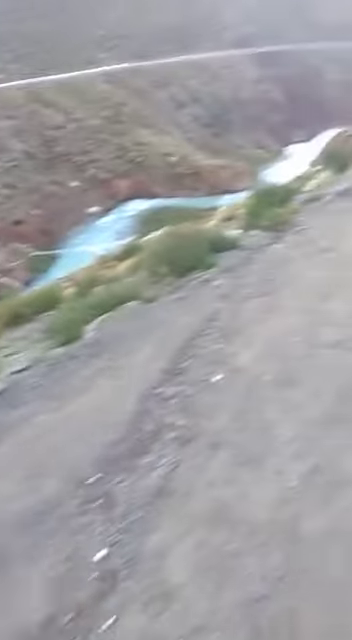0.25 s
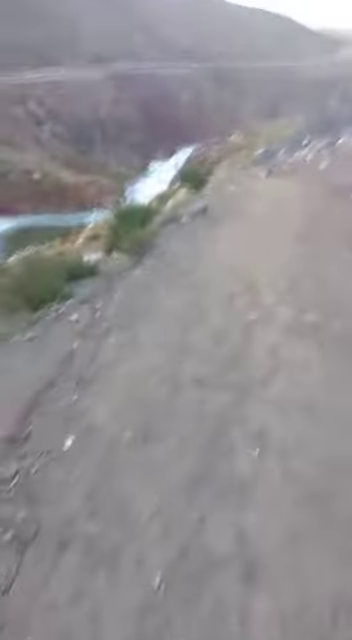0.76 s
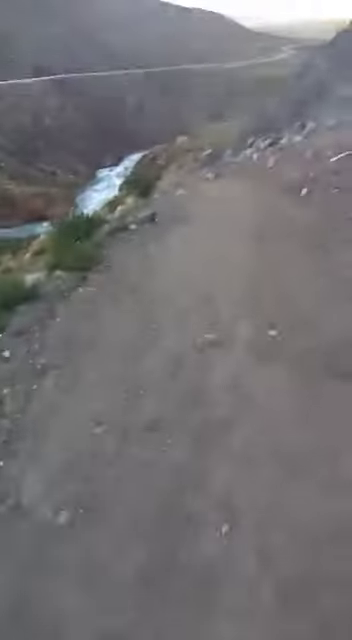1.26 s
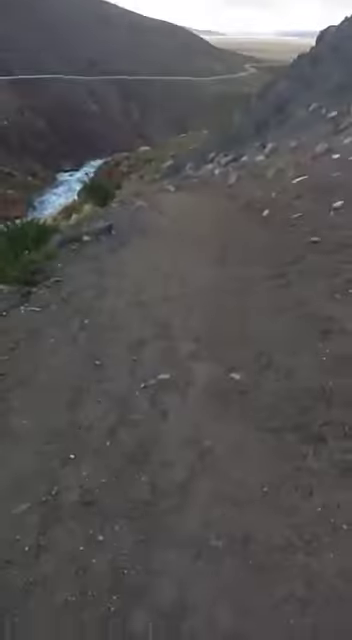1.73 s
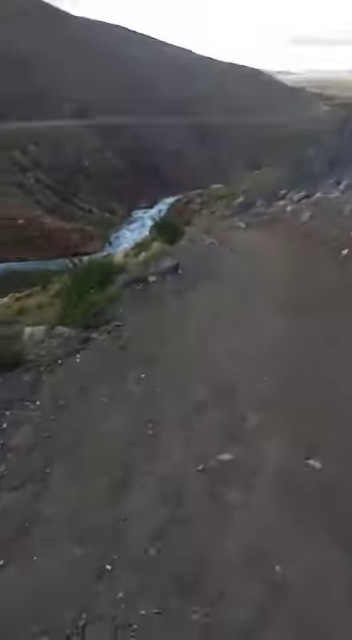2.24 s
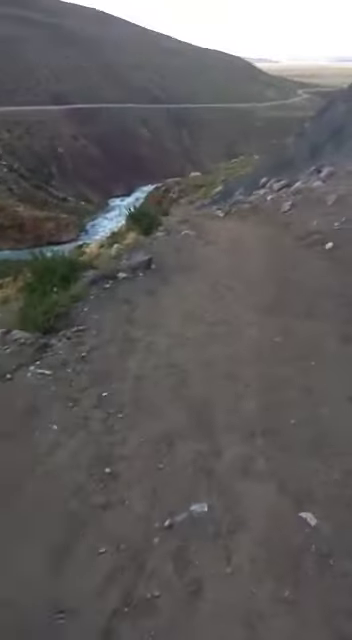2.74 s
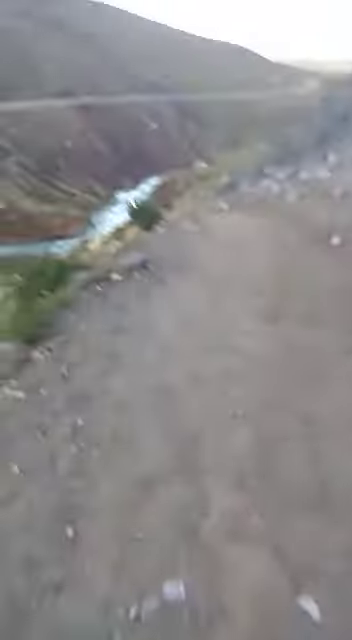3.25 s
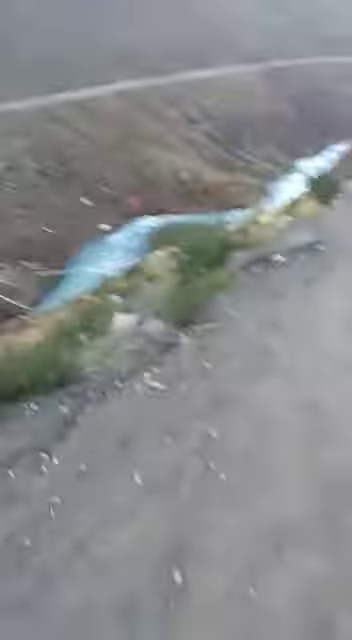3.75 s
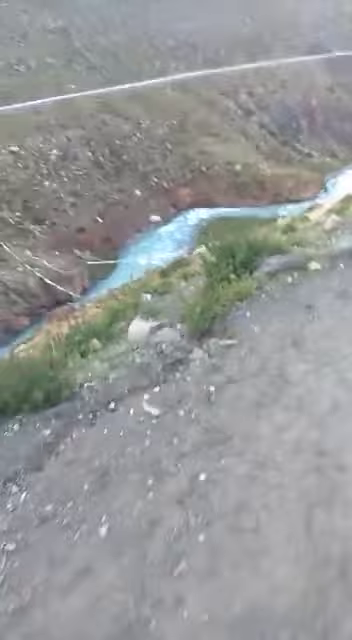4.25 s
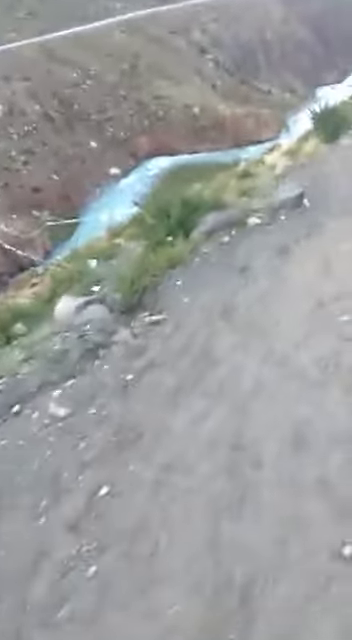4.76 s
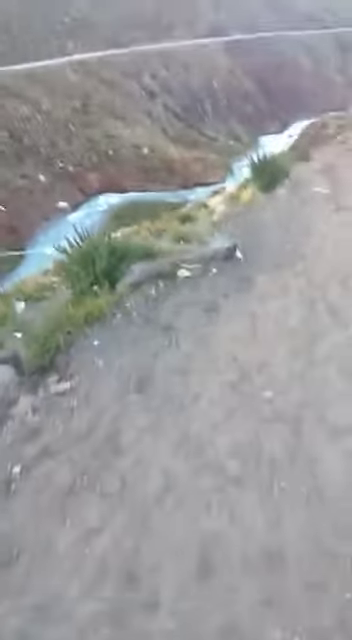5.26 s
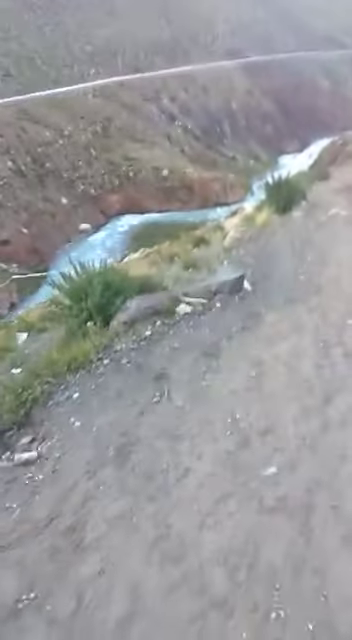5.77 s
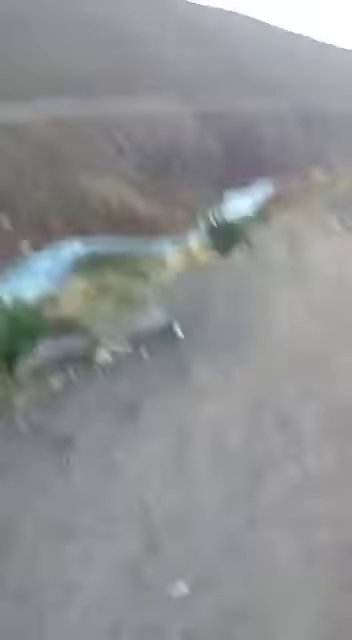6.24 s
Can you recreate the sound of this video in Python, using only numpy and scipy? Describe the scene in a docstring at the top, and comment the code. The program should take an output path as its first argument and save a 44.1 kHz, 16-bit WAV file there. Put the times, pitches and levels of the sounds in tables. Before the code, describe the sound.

Steady footsteps crunch brightly on fine gravel, mostly to the left, with sharp stone ticks and a faint river rushing steadily behind.

```python
"""Footsteps on gravel above a river

Someone strides along a gravel track holding a camera. Feet scuff, land and grind fine grit into a bright crunch,
mostly on the left, that dulls at most roll-offs: dense grains, split by pitch and shaped by the weight on the sole.
Pebbles grate, flat stones skid (noise bursts through resonances) and gravel ticks; the hand bumps the camera and
later rubs it (wavering resonances, short low tones). The river is coloured noise, rushing almost steadily."""
import sys
import numpy as np
from scipy import signal
from scipy.fft import rfft, irfft
from scipy.io import wavfile
from scipy.ndimage import uniform_filter1d

SR = 44100
rng = np.random.default_rng(int(sys.argv[2]) if len(sys.argv) > 2 else 0)


def dump(signal):
    """Clip the signal to [-1, 1] and save it as 16-bit WAV at the path in sys.argv[1]."""
    limited = np.clip(np.atleast_2d(signal).T, -1, 1)
    pcm = np.round(limited * 32767).astype(np.int16)
    wavfile.write(sys.argv[1], SR, pcm)


N = 286650
TIME = np.arange(N) / SR


def undb(db):
    """Decibels to gain."""
    return 10 ** (np.asarray(db) / 20)


def unit(x):
    """Scale to rms 1."""
    return x / np.sqrt(np.mean(x ** 2) + 1e-20)


def over_hz(points):
    """Spread a (frequency, value) table over the bins of the spectrum."""
    hz, value = np.transpose(points)
    bin_hz = np.arange(N // 2 + 1) * SR / N
    return np.interp(np.log(bin_hz + 1), np.log(hz), value)


def weigh(x, gain):
    """Multiply the spectrum of x by a gain per bin."""
    return irfft(rfft(x) * gain, N)


def colour(x, points):
    """Filter x by a (frequency, level) table, then scale to rms 1."""
    return unit(weigh(x, undb(over_hz(points))))


def resonate(x, hz, width_hz):
    """A steep resonance: the same band-pass twice, width_hz being that of each pass."""
    b, a = signal.iirpeak(min(hz, .45 * SR), hz / width_hz, fs=SR)
    once = signal.lfilter(b, a, x)
    return signal.lfilter(b, a, once)


def highpass(x, hz):
    """Steep low cut."""
    return signal.sosfilt(signal.butter(4, hz, "high", fs=SR, output="sos"), x)


def walk(rate):
    """Slow chance at rms 1: random levels held 1 / rate s and slewed twice."""
    hold = max(int(SR / rate), 2)
    levels = np.repeat(rng.standard_normal(N // hold + 1), hold)
    slewed = uniform_filter1d(uniform_filter1d(levels, hold), hold)
    return unit(slewed[:N])


def grains(per_s, spread_db):
    """Tiny impacts at random moments, of random sign and with strengths scattered in dB."""
    size = undb(spread_db * np.minimum(rng.exponential(size=N), 5))
    hits = rng.random(N) < per_s / SR
    return unit(hits * rng.choice([-1, 1], N) * size)


def band_flicker(x, depth_db, size=384):
    """Random band-by-band flicker: each narrow band of the noise swells and fades on its own."""
    _, _, frames = signal.stft(x, nperseg=size)
    chance = uniform_filter1d(rng.standard_normal(frames.shape), size=2, axis=0)
    chance = uniform_filter1d(chance, size=5, axis=1)
    swell = undb(depth_db * np.clip(unit(chance), -2, 2))
    return unit(signal.istft(frames * swell, nperseg=size)[1][:N])


def rasp(length_s):
    """A brief noise burst that swells quickly and dies away."""
    age = np.arange(SR // 4) / SR / (length_s / 3)
    return rng.standard_normal(SR // 4) * age * np.exp(1 - age)


def burst(ring, length_s, db):
    """Scale a short sound to db, its energy taken over length_s."""
    return unit(ring) * np.sqrt(length_s * SR / len(ring)) * undb(db)


def sides(pan_db):
    """Left and right gains, the left one being 1."""
    return np.array([[1], [undb(-pan_db)]])


def add(out, s, sound):
    """Mix a sound into out from time s."""
    i = max(int(s * SR), 0)
    out[..., i:i + sound.shape[-1]] += sound[..., :N - i]


def around_mean(level_db):
    """The crunch level as dB above or below its average."""
    return level_db - level_db.mean()


# colour of the rushing water: (frequency [Hz], relative level [dB])
RIVER_COLOUR = [(25, -39), (60, -26.5), (100, -13.5), (135, -4.5), (175, 0.5), (250, -1), (400, -6.5),
                (800, -9), (1500, -9.5), (2700, -14), (3300, -15), (4700, -22.5), (8000, -31), (15500, -56)]
# how alike the two sides are: (frequency [Hz], coherence [0-1])
RIVER_LIKENESS = [(60, 0.89), (130, 1), (290, 0.92), (640, 0.71), (1400, 0.29), (3100, 0.011)]
# side lean of the water: (frequency [Hz], left over right [dB])
RIVER_LEAN = [(100, 0.5), (300, -1.5), (1200, -0.5), (3000, -0.5)]


def river(level_db=-62.5, swell_db=1.0):
    """Distant white water: a smooth rush of noise, nearly alike on both sides in the bass and wide above."""
    likeness = np.clip(over_hz(RIVER_LIKENESS), 0, 1)
    mid = rfft(rng.standard_normal(N)) * np.sqrt(1 + likeness)
    side = rfft(rng.standard_normal(N)) * np.sqrt(1 - likeness)
    rush = np.array([colour(irfft(mid + sign * side, N), RIVER_COLOUR) for sign in (1, -1)])
    rush = weigh(rush, undb(np.outer([1, -1], over_hz(RIVER_LEAN)) / 2))
    return rush * undb(level_db + swell_db * walk(3.07))


# soft bumps through the camera body: (time [s], level before rise and low cut [dB], pitch [Hz], 60 dB decay [s])
BUMPS = [(.003, -52, 199, 0.084), (0.166, -45.5, 355, 0.039), (1.612, -43, 176, 0.042),
         (4.187, -47.5, 186, 0.085), (4.405, -51.5, 173, 0.062), (6.206, -38.5, 270, 0.067),
         (6.2193, -40.5, 277, 0.06)]


def bumps(rise_s=0.0023, low_cut_hz=145, pan_db=-4.5):
    """Soft fingers push the camera body, which answers with a few low, decaying cycles."""
    out, t = np.zeros((2, N)), TIME[:SR // 4]
    rise = 1 - np.exp(-(t / rise_s) ** 2)
    for s, db, hz, t60 in BUMPS:
        thud = rise * undb(db - 60 * t / t60) * np.sin(2 * np.pi * hz * t)
        add(out, s, thud * sides(pan_db))
    return highpass(out, low_cut_hz)


# from CONTACT_S on, the skin keeps creeping faintly between rubs
CONTACT_S, CREEP_DB = 3.5, -63.5


def wavering(note, offset_hz):
    """Shift the pitch of a note by a changing offset."""
    shift = np.exp(2j * np.pi * np.cumsum(offset_hz) / SR)
    return np.real(signal.hilbert(note) * shift)


# resonances of the camera case: (frequency [Hz], width of each pass [Hz], level before trim [dB])
CASE_MODES = [(2905, 53, -71.5), (3486, 44, -76), (3975, 70, -66), (4097, 86, -63.5), (4362, 110, -68),
              (4586, 34, -70)]


def case(level_db, rise_s=0.63, gain_db=-0.7, own_db=6, waver_hz=75, follow=0.49, pan_db=20):
    """The creeping hand keeps the stiff case ringing; its pitches wander and each step jolts it louder."""
    ring = 0
    for hz, width_hz, db in CASE_MODES:
        note = wavering(resonate(grains(3000, spread_db=0), hz, width_hz), waver_hz * walk(18))
        ring = ring + unit(note * undb(own_db * np.tanh(walk(20)))) * undb(db)
    touch = np.sqrt(np.clip((TIME - CONTACT_S) / rise_s, 0, 1))
    return ring * touch * undb(gain_db + follow * around_mean(level_db)) * sides(pan_db)


# the hand slides on the camera in short rubs:
# (middle time [s], level before trim [dB], half length [s], main hollow resonance before waver [Hz])
RUBS = [(3.552, -50.5, 0.027, 2235), (3.647, -56, 0.032, 2185), (3.762, -54, 0.016, 2255),
        (3.83, -55, 0.026, 2230), (3.973, -50.5, 0.041, 2322), (4.127, -49.5, 0.038, 2260),
        (4.258, -52.5, 0.04, 2242), (4.384, -45, 0.044, 2204), (4.503, -53.5, 0.042, 2250),
        (4.6, -53.5, .028, 2297), (4.753, -48, 0.029, 2253), (4.819, -56, 0.023, 2304),
        (4.929, -55, 0.018, 2090), (5.013, -56, 0.02, 2270), (5.112, -55, 0.019, 1953),
        (5.228, -53, 0.02, 2220), (5.386, -63, 0.074, 2140), (5.472, -54.5, 0.022, 2062),
        (5.598, -59, 0.03, 2114), (5.795, -60, 0.03, 2018), (5.897, -53.5, 0.023, 2344),
        (6.1, -74, 0.03, 2000), (6.245, -64, .022, 2124), (6.341, -72, .025, 2046),
        (6.483, -56.5, 0.038, 2190)]


def rub_power():
    """Power of the hand's friction: a steady creep with a swell for each rub."""
    power = undb(CREEP_DB) ** 2 * np.clip((TIME - CONTACT_S) / .1, 0, 1)
    for s, db, length_s, _ in RUBS:
        power = power + undb(db) ** 2 * np.exp(-np.minimum(((TIME - s) / length_s) ** 2, 40))
    return power


# hollow between hand and case: (ratio to the typical main resonance, width of each pass [Hz],
# relative level halfway through the contact [dB], growth as the grip shifts [dB/s])
HOLLOW = [(0.599, 150, -14, 1.5), (0.929, 90, -4, 3), (1.001, 110, 0.5, 0.5), (1.08, 90, -6.5, 3)]


def grip(gain_db=-3.0, flicker_db=3.5, own_db=3, waver_hz=36, pan_db=20):
    """Skin sticks and slips on the case and rings the hollow of the hand, which shifts by rub and wavers."""
    middle_s, _, _, rub_hz = np.transpose(RUBS)
    hz = np.interp(TIME, middle_s, rub_hz)
    centre_hz = np.median(hz)
    since_s = np.maximum(TIME - CONTACT_S, 0)
    ring = 0
    for ratio, width_hz, db, growth in HOLLOW:
        offset_hz = hz - centre_hz + ratio * waver_hz * walk(25)
        note = wavering(resonate(grains(3000, spread_db=-0.5), ratio * centre_hz, width_hz), offset_hz)
        grown_db = db + growth * (since_s - since_s[-1] / 2)
        ring = ring + note * undb(grown_db + own_db * np.tanh(walk(30)))
    ring = unit(ring * undb(flicker_db * np.tanh(2 * walk(90))))
    return ring * np.sqrt(rub_power()) * undb(gain_db) * sides(pan_db)


# hard ticks of snapping gravel: # (time [s], level before the crack and snap gains [dB], 60 dB decay of the
# crackle [s], ring share, snap length [s])
TICKS = [(0.4414, -40, 0.049, 0.024, .0003), (.457, -35, .02, .05, .0003), (.4655, -33, 0.027, .05, .0005),
         (.631, -32, 0.0092, 0.058, .0002), (0.723, -32, 0.022, 0.084, .0003),
         (1.1657, -28, .015, .05, .0005), (1.3002, -29, .015, .05, 0.00032),
         (1.5508, -31, 0.03, 0.15, .001), (1.6195, -32, .02, 0.1, .0003), (1.626, -36, .03, .05, .001),
         (1.716, -40, .015, .05, .0003), (1.758, -31, .02, .05, .0004), (2.1365, -41, .015, .05, .0003),
         (2.3401, -43, 0.014, 0.046, .0006), (3.0215, -42, 0.0097, .05, 0.00025),
         (3.388, -27, 0.02, 0.054, .0002), (3.5269, -32, .015, .05, .0006), (3.5882, -29, .02, .05, .0006),
         (3.928, -39, .02, 0.047, .0005), (4.0183, -34, .015, .05, .0005),
         (4.1647, -29, 0.011, 0.28, 0.00032), (4.4372, -28.5, .014, 0.34, .0003),
         (4.6618, -35, .015, .05, 0.00051), (4.8108, -34, .012, 0.044, 0.00033),
         (5.9003, -27, .012, 0.049, .0003), (6.149, -29, 0.055, 0.2, 0.00028)]
# their ring: (frequency [Hz], 60 dB decay [s], relative level [dB])
TICK_MODES = [(8177, .022, -10), (10700, 0.035, 8.5), (12900, .01, 5)]


def ticks(crack_db=-6, snap_db=3.5, edge_hz=8600, pan_db=23):
    """A sharp snap, a bright fading crackle of noise and a short ring."""
    out, t = np.zeros((2, N)), TIME[:SR // 8]
    ring = sum(undb(db - 60 * t / t60) * np.sin(2 * np.pi * hz * t) for hz, t60, db in TICK_MODES)
    for s, db, t60, share, snap_s in TICKS:
        fade = undb(crack_db - 60 * t / t60) + undb(snap_db) * np.exp(-t / snap_s)
        crack = highpass(rng.choice([-1, 1], len(t)) * fade, edge_hz)
        add(out, s, undb(db) * (crack + share * ring) * sides(pan_db))
    return out


# flat stones skid and settle: (time [s], level [dB], length [s], pitch ratio of the ring)
SKID = [(0.619, -56.5, 0.022, 0.85), (1.882, -56, .016, 0.98), (1.893, -46.5, 0.0095, 0.98),
        (1.902, -40, 0.0072, 1), (1.921, -54, 0.029, .99), (1.957, -57.5, 0.022, 1.0),
        (4.349, -54.5, 0.043, 1.1)]
# their ring at ratio 1: (frequency [Hz], width of each pass [Hz], relative level [dB])
STONE_MODES = [(2010, 65, -5.5), (2500, 90, 0.5), (3054, 64, 0.5), (3346, 84, 0), (3540, 59, -1),
               (3770, 120, 1), (3996, 74, 0)]


def skid(pan_db=7):
    """A flat stone chatters over its neighbours and rings at each touch, a little differently as it tilts."""
    out = np.zeros((2, N))
    for s, db, length_s, ratio in SKID:
        slips = rasp(length_s)
        ring = sum(undb(mode_db) * unit(resonate(slips, hz * ratio, width_hz))
                   for hz, width_hz, mode_db in STONE_MODES)
        add(out, s, burst(ring, length_s, db) * sides(pan_db))
    return out


# pebbles pressed together: (time [s], level before trim [dB], pitch [Hz], length [s])
PEBBLES = [(0.621, -64.5, 1440, 0.04), (1.044, -58, 1445, 0.031), (1.534, -61.5, 1610, 0.075),
           (1.645, -60, 1490, 0.041), (2.762, -60, 1240, 0.028), (3.374, -57, 1520, 0.043),
           (3.38, -54.5, 1074, 0.016), (3.596, -58, 1250, 0.038), (4.081, -60.5, 1304, 0.046),
           (3.917, -54.5, 1497, 0.045), (4.349, -54, 2290, 0.064), (4.351, -53.5, 1487, 0.075),
           (4.35, -57.5, 920, 0.023), (5.203, -59, 1214, 0.058), (5.325, -58.5, 1180, 0.068),
           (5.416, -58, 1275, 0.035), (5.65, -61, 1295, 0.048), (6.004, -57, 1632, 0.036),
           (6.084, -57, 1239, 0.029), (6.207, -57, 1356, 0.029)]


def pebbles(width_hz=90, gain_db=-0.3, pan_db=18):
    """Pebbles grate against each other, each a noisy rasp through its own hollow note."""
    out = np.zeros((2, N))
    for s, db, hz, length_s in PEBBLES:
        note = resonate(rasp(length_s), hz, width_hz)
        add(out, s, burst(note, length_s, db + gain_db) * sides(pan_db))
    return out


def faint_rings(level_db, count, db, low_hz, high_hz, width_hz, length_s, follow, spread_db=2.5, pan_db=18):
    """Many faint narrow-band rings at random moments and pitches, louder when the crunch is loud."""
    out = np.zeros((2, N))
    swell_db = around_mean(level_db)
    for when, pitch, force in rng.random((count, 3)):
        i = int(when * N)
        note = resonate(rasp(length_s), low_hz + pitch * (high_hz - low_hz), width_hz)
        note_db = db + follow * swell_db[i] + spread_db * min(-np.log(1 - force), 2)
        add(out, i / SR, burst(note, length_s, note_db) * sides(pan_db))
    return out


def low_rings(level_db):
    """Faint narrow rings at 1.9-3 kHz."""
    return faint_rings(level_db, count=150, db=-71.0, low_hz=1949, high_hz=2950, width_hz=58,
                       length_s=0.043, follow=0.3)


# gain of the faint high rings by pitch: (frequency [Hz], gain [dB])
HIGH_RING_GAIN = [(3300, -2), (4050, 1.5), (4750, -11.5), (5050, -2.5), (5450, 5.5), (6300, -3.5)]


def high_rings(level_db):
    """Faint, slightly shorter rings at 3.3-6.3 kHz that follow the crunch level more closely."""
    rings = faint_rings(level_db, count=400, db=-72.5, low_hz=3293, high_hz=6345, width_hz=45,
                        length_s=0.036, follow=0.68)
    return weigh(rings, undb(over_hz(HIGH_RING_GAIN)))


# coarse gravel rolling back after a step: (middle time [s], level [dB], half length [s])
ROLLS = [(1.32, -57, .04), (2.49, -49, .06), (3.12, -62, .06), (3.71, -52.5, .04), (5.402, -52, .07),
         (5.99, -52, .08)]
# its colour: (frequency [Hz], relative level [dB])
COARSE_COLOUR = [(2500, -30), (4100, -8), (4900, -20), (5500, -1), (6600, 0), (8000, -2), (11000, -10),
                 (15500, -20)]


def rolls(depth_db=4, pan_db=20):
    """Coarse gravel rolls back as the toe pushes off: a duller, rattling tail to the crunch."""
    power = sum(undb(db) ** 2 * np.exp(-((TIME - s) / length_s) ** 2) for s, db, length_s in ROLLS)
    rattle = band_flicker(colour(grains(2500, spread_db=1.5), COARSE_COLOUR), depth_db)
    return rattle * np.sqrt(power) * sides(pan_db)


# colour of the grit on the near (left) side, also for the crunch: (frequency [Hz], relative level [dB])
GRIT_NEAR = [(1500, -40), (3200, -27.5), (4100, -21), (4800, -34.5), (5450, -15.5), (6100, -12.5),
             (6800, -2.5), (8000, 0), (9900, 1.5), (12000, -1.5), (15500, -4)]


def chips(level_db, per_s=130, spread_db=1.0, db=-54, follow=1.0, snap_s=0.00082, pan_db=20):
    """Single chips of gravel snap out from under the sole and stand out of the crunch as a fine crackle."""
    snap_power = signal.lfilter([1], [1, -np.exp(-2 / (snap_s * SR))], grains(per_s, spread_db) ** 2)
    crackle = colour(np.sqrt(snap_power) * rng.choice([-1, 1], N), GRIT_NEAR)
    return crackle * undb(db + follow * around_mean(level_db)) * sides(pan_db)


def press(age, attack_s, hold_s, sag_db, release_s):
    """Weight on one sole: it builds up, sags (or grows, if sag_db < 0) while the foot rolls, and lifts."""
    outside = np.minimum(age, 0) / attack_s - np.maximum(age - hold_s, 0) / release_s
    return np.exp(np.maximum(outside, -30)) * undb(-sag_db * np.clip(age / hold_s, 0, 1))


ROLL_S = 0.015  # time in which the sole rolls off and the brightness turns
SHADED_LAG_S, SHADED_POWER = 0.0095, 1.84  # the shaded (right) side swells later and more steeply
# grit that keeps settling between steps: level, left over right, fine over coarse
SETTLE_DB, SETTLE_PAN_DB, SETTLE_BRIGHT_DB = -59, 52, 12
SCUFF_BRIGHT_DB = 4  # fine over coarse
# footfalls of uneven force: (time [s], level before trim [dB], attack [s], hold [s], sag over the hold [dB],
# release [s], left over right before trim [dB], brightness as fine over coarse [dB],
# dulling either side of it at roll-off, negative brightens [dB])
STEPS = [(0.576, -38, 0.071, 0.18, 8.5, 0.16, 24, 8.5, -5),
         (1.185, -35, 0.072, 0.11, 4, 0.065, 17.5, 3, 6.5),
         (1.766, -35, 0.05, 0.16, 4.5, 0.11, 16, 4.5, 1.5),
         (2.346, -33.5, 0.026, 0.1, 1.5, 0.07, 14, 3.5, 4.5),
         (2.926, -39, 0.14, 0.15, -1.9, 0.15, 19, 2, 3),
         (3.549, -34.5, 0.036, 0.098, -3.5, 0.053, 16, 3, 4),
         (4.025, -40.5, 0.015, 0.068, -2.5, 0.35, 18, 2.5, 4.5),
         (4.68, -35, 0.05, 0.13, 6, 0.072, 27, -4, 3.5), (5.152, -40.5, 0.045, 0.19, -4, 0.1, 16, 2.5, 1.5),
         (5.797, -34, 0.043, 0.14, 3.5, 0.055, 17, -0.5, 7.5),
         (6.336, -35, 0.056, 0.16, 4.5, 0.086, 16.5, -2.5, 7)]
# light scuffs of the moving foot:
# (middle time [s], level before trim [dB], half length [s], left over right before trim [dB])
SCUFFS = [(0, -46.5, 0.1, 55), (0.214, -51.5, 0.067, 49), (0.473, -44, 0.034, 34), (0.733, -42, 0.013, 21),
          (0.773, -39, 0.023, 21), (0.878, -49, .08, 28), (1.008, -46, .035, 36), (1.071, -40, 0.023, 29),
          (1.303, -46, .018, 23), (1.456, -55.5, 0.041, 39), (1.654, -44, 0.091, 41),
          (2.042, -50, 0.044, 25), (2.263, -43.5, 0.096, 29), (2.613, -50, 0.026, 31),
          (2.807, -47.5, 0.034, 29), (3.394, -38.5, 0.0079, 24), (3.405, -44.5, 0.1, 29),
          (3.465, -42, 0.012, 21), (3.82, -50, .06, 28), (3.961, -43.5, 0.058, 26), (4.115, -41, 0.011, 14),
          (4.384, -42.5, 0.015, 22), (4.573, -47, 0.16, 21), (5.07, -48, 0.027, 28), (5.61, -53, 0.032, 32),
          (5.687, -43.5, 0.065, 16), (5.903, -40, 0.026, 19), (6.082, -55, 0.062, 22),
          (6.212, -43.5, 0.04, 25)]


def stride():
    """Steps and scuffs add their power into near level, shaded level and brightness of the grit, all in dB."""
    t = TIME[::44]  # about one point per millisecond
    near = np.full(len(t), undb(SETTLE_DB) ** 2)
    shaded = near * undb(-SETTLE_PAN_DB) ** 2
    bright = near * SETTLE_BRIGHT_DB  # weighted by power
    for s, db, attack_s, hold_s, sag_db, release_s, pan_db, bright_db, dulling_db in STEPS:
        power = (undb(db) * press(t - s, attack_s, hold_s, sag_db, release_s)) ** 2
        late = press(t - s - SHADED_LAG_S, attack_s / SHADED_POWER, hold_s, sag_db, release_s / SHADED_POWER)
        dulling = dulling_db * np.tanh((t - s - hold_s) / ROLL_S)
        near = near + power
        shaded = shaded + (undb(db - pan_db) * late) ** 2
        bright = bright + power * (bright_db - dulling)
    for s, db, length_s, pan_db in SCUFFS:
        power = undb(db) ** 2 * np.exp(-((t - s) / length_s) ** 2)
        near = near + power
        shaded = shaded + power * undb(-pan_db) ** 2
        bright = bright + power * SCUFF_BRIGHT_DB
    return [np.interp(TIME, t, c) for c in (10 * np.log10(near), 10 * np.log10(shaded), bright / near)]


# colour of the grit on the shaded (right) side: (frequency [Hz], relative level [dB])
GRIT_SHADED = [(2000, -15), (5000, -12.5), (7000, -1), (9000, 7.5), (10300, 13), (12500, 2), (15500, -0.5)]


def crunch(level_db, shaded_level_db, bright_db, per_s=22000, spread_db=0.5, flicker_db=0.6, surge_db=0.78,
           near_db=0.16, shaded_db=0.0, coarse_growth=0.43, coarse_lag_s=0.086, coarse_linger=0.25,
           depth_db=2.0, coarse_depth_db=7.5):
    """The sole crushes grit: countless grains slip in uneven surges; coarse ones join under weight and linger."""
    surges_db = flicker_db * walk(110) + surge_db * walk(35)
    near = band_flicker(colour(grains(per_s, spread_db), GRIT_NEAR), depth_db)
    shaded = colour(grains(per_s, spread_db), GRIT_SHADED)
    # the smaller the grain, the higher it sounds; these two tables hold plain gains
    fine = weigh(near, over_hz([(8000, 0.035), (14000, 1)]))
    coarse = weigh(near, over_hz([(6000, 1), (7500, 0.054)]))
    middle = near - fine - coarse
    # the level a moment ago against now: positive while the foot eases off
    easing_db = np.interp(TIME - coarse_lag_s, TIME, level_db) - level_db
    coarse_db = coarse_growth * around_mean(level_db) + coarse_linger * easing_db - bright_db / 2
    rough = band_flicker(coarse, coarse_depth_db) * coarse.std()
    near = middle + fine * undb(bright_db / 2) + rough * undb(coarse_db)
    left = near * undb(level_db + near_db)
    right = shaded * undb(shaded_level_db + shaded_db)
    return undb(surges_db) * np.array([left, right])


def scene():
    """River, hand and feet in open air."""
    level_db, shaded_level_db, bright_db = stride()
    hand = bumps() + case(level_db) + grip()
    stones = skid() + pebbles()
    rings = low_rings(level_db) + high_rings(level_db)
    feet = rolls() + chips(level_db) + crunch(level_db, shaded_level_db, bright_db)
    return river() + hand + ticks() + stones + rings + feet


def record(dry, top_hz=15850):
    """The camera cuts the top of the treble with a very steep low-pass."""
    return signal.sosfilt(signal.ellip(12, .1, 80, top_hz, fs=SR, output="sos"), dry)


dry = scene()
out = record(dry)
dump(out)
```